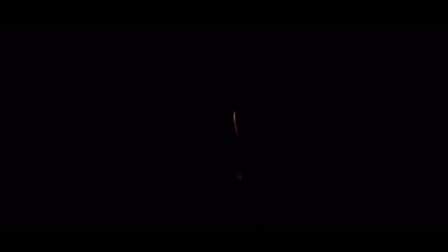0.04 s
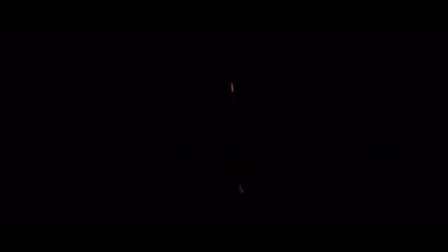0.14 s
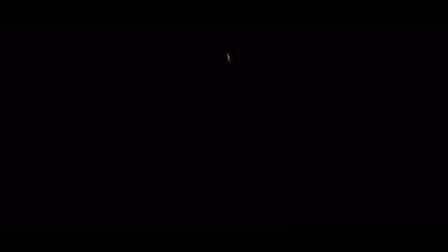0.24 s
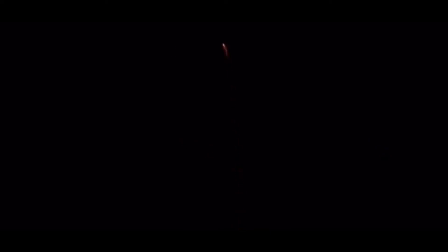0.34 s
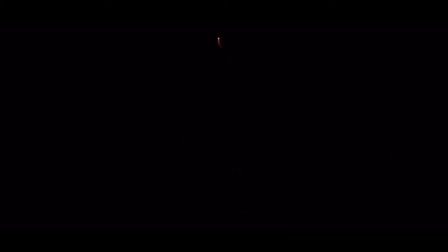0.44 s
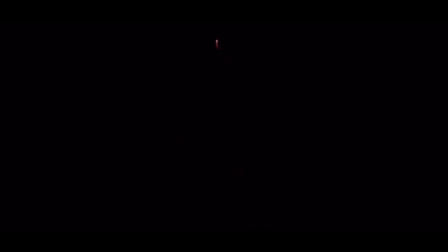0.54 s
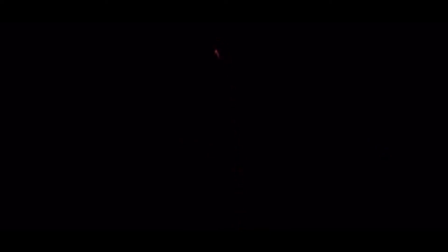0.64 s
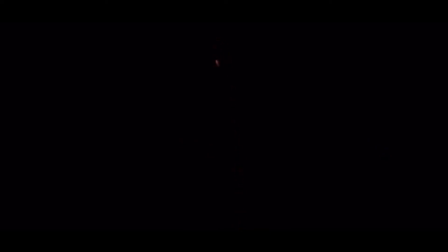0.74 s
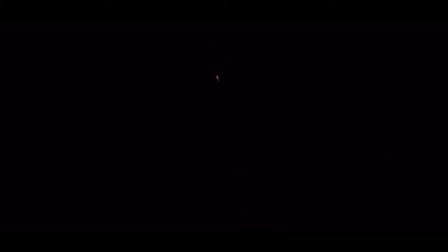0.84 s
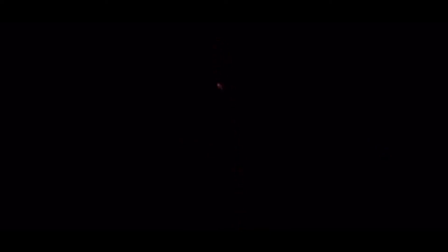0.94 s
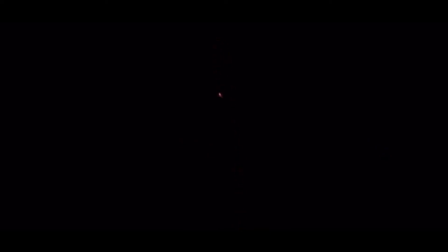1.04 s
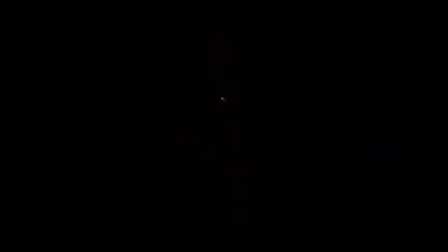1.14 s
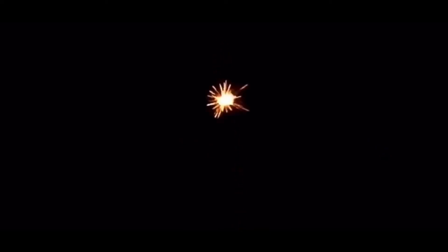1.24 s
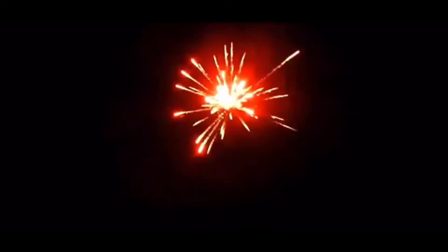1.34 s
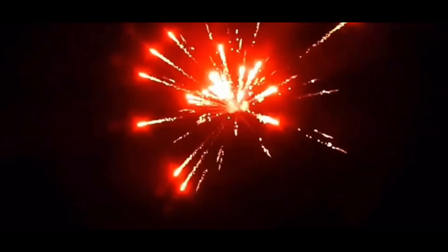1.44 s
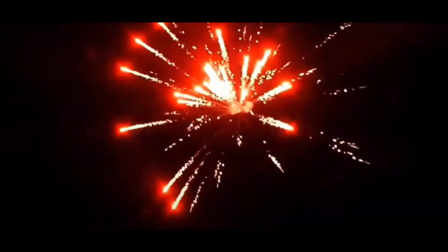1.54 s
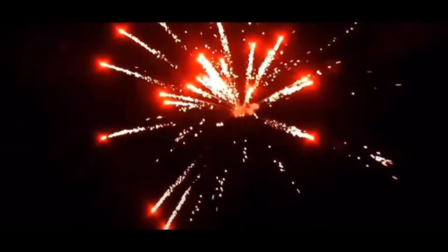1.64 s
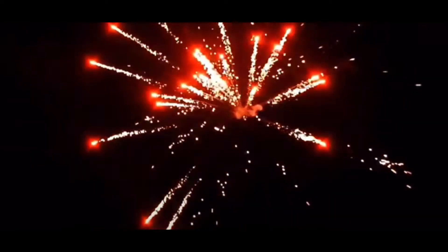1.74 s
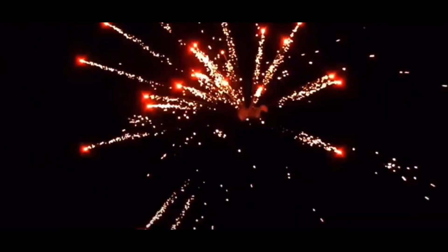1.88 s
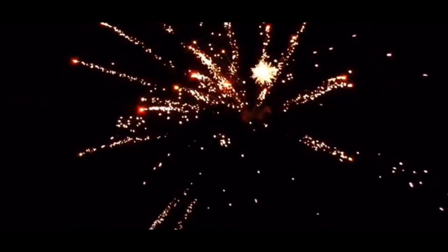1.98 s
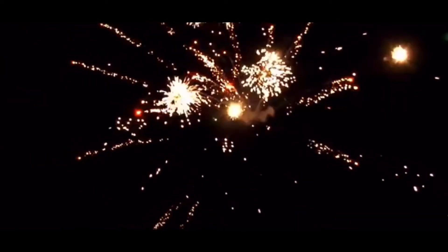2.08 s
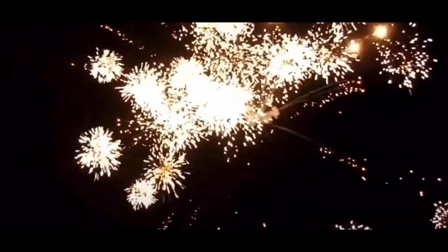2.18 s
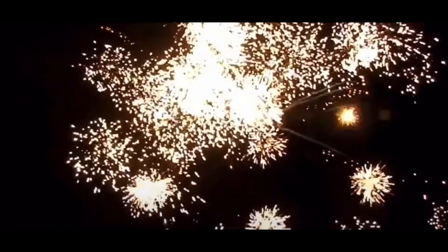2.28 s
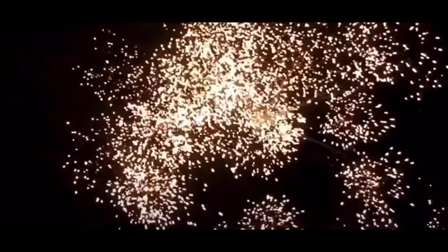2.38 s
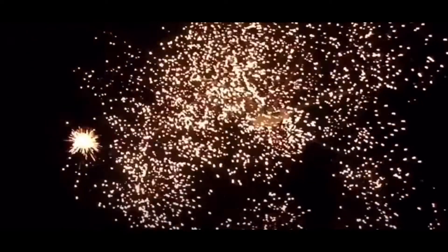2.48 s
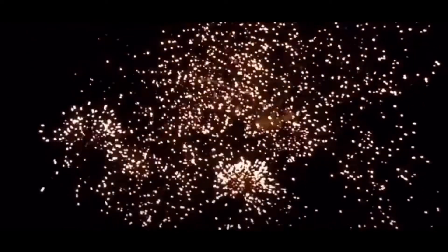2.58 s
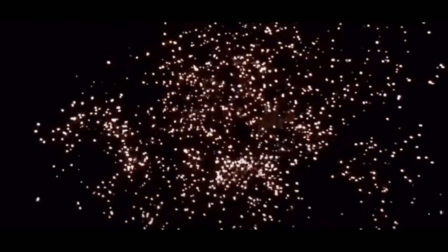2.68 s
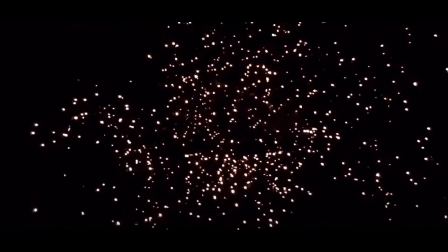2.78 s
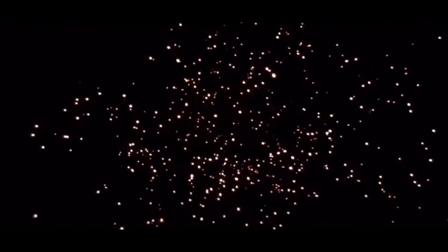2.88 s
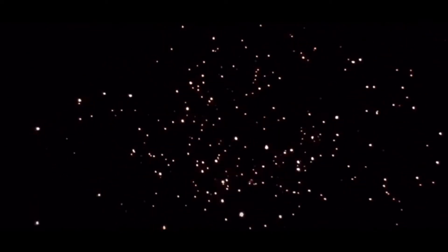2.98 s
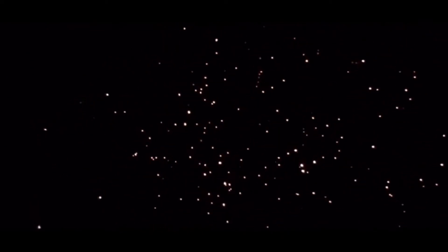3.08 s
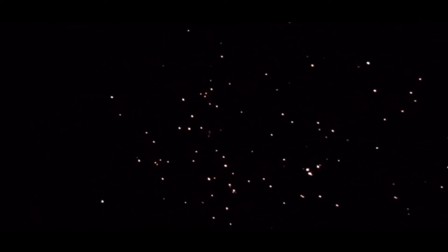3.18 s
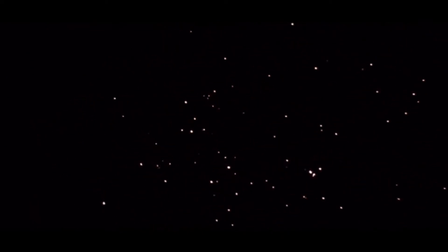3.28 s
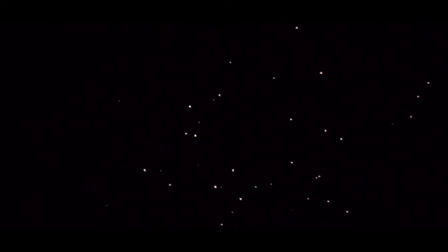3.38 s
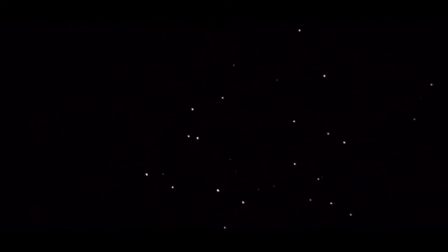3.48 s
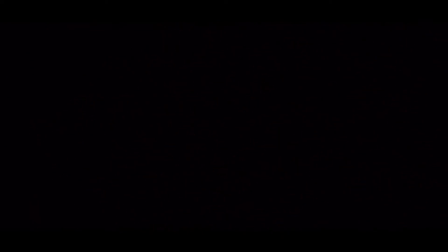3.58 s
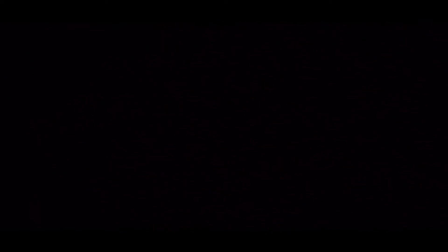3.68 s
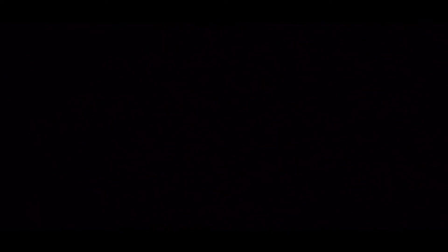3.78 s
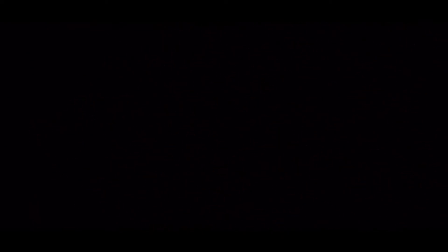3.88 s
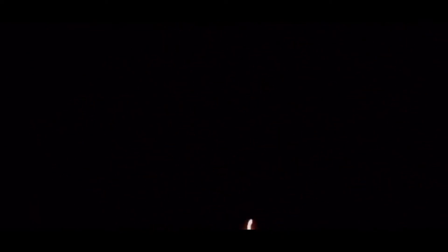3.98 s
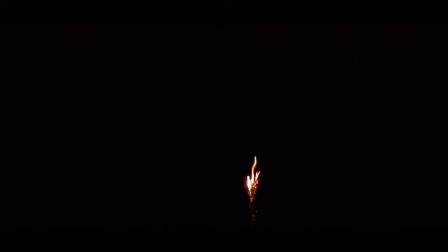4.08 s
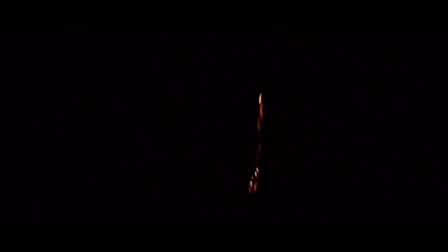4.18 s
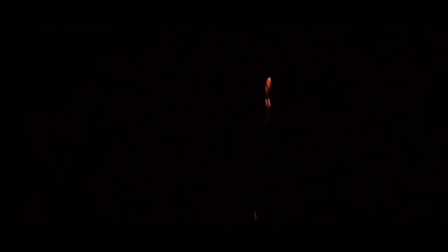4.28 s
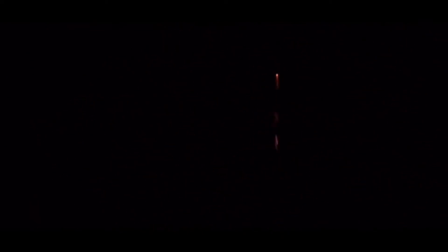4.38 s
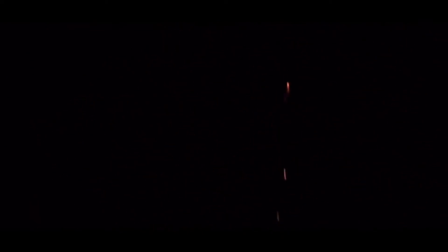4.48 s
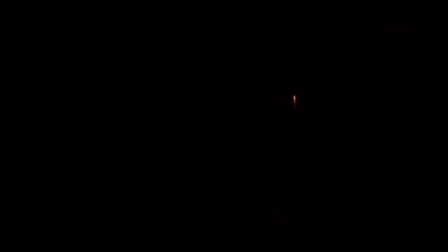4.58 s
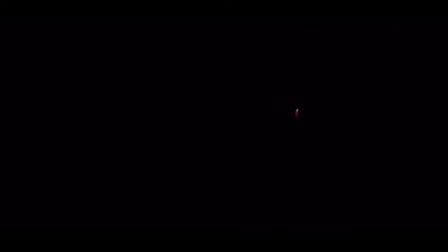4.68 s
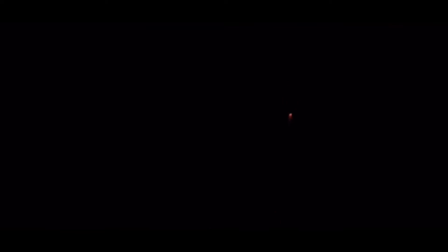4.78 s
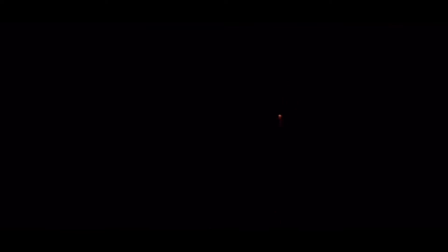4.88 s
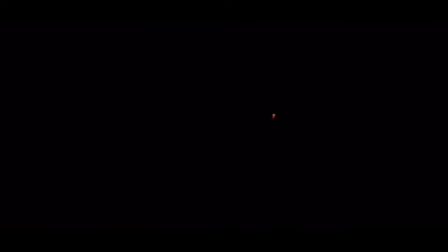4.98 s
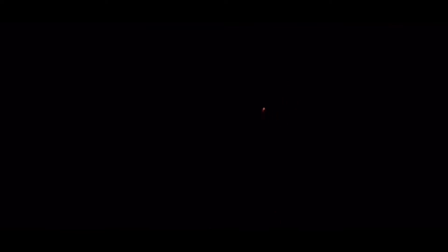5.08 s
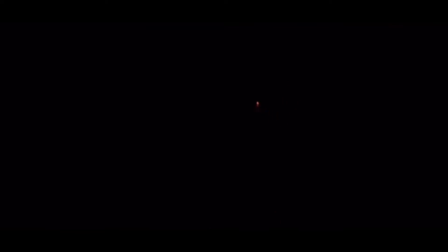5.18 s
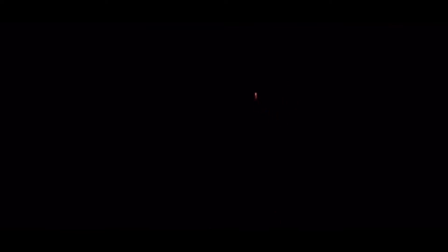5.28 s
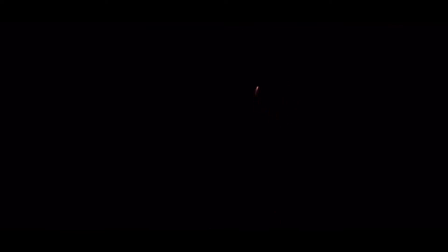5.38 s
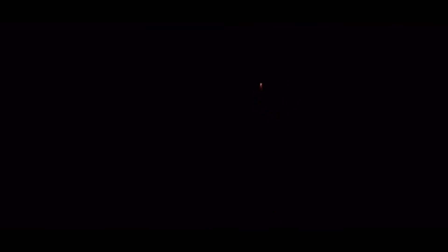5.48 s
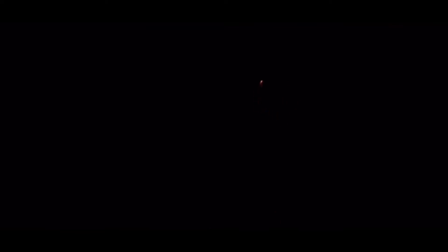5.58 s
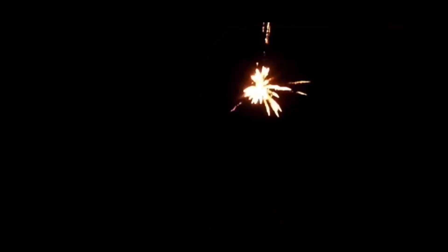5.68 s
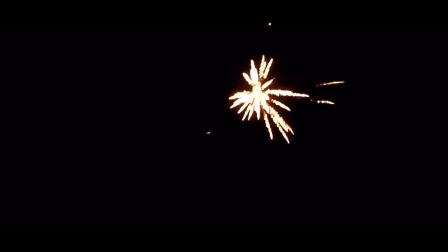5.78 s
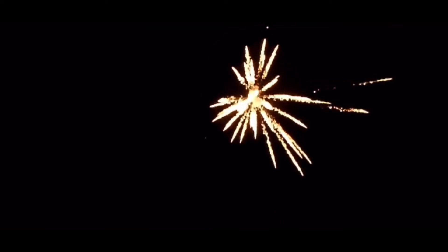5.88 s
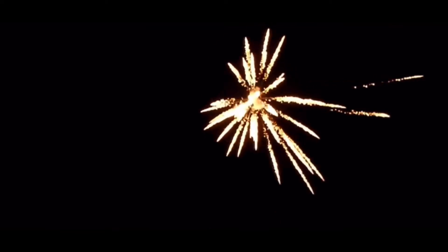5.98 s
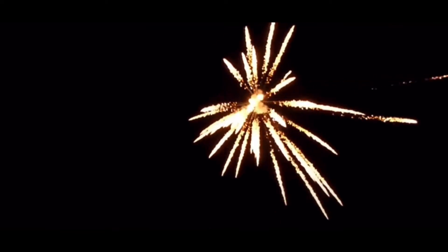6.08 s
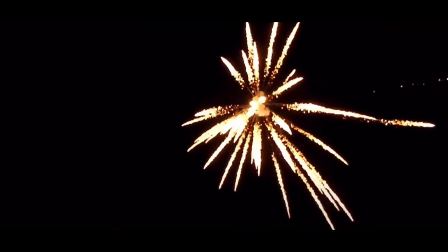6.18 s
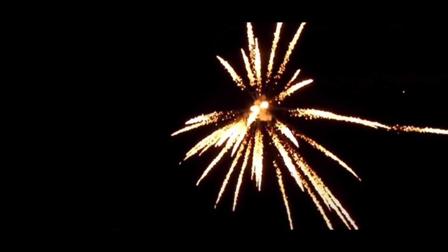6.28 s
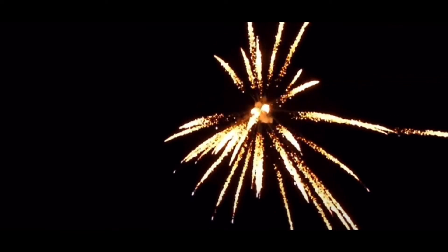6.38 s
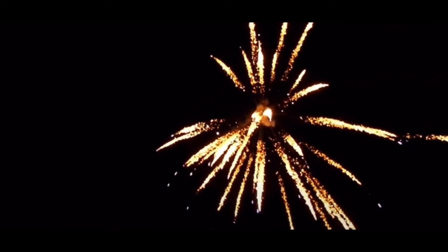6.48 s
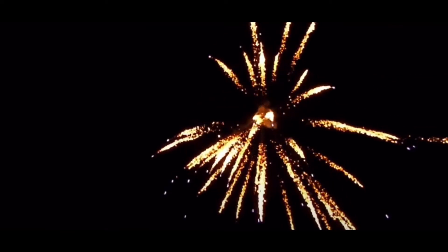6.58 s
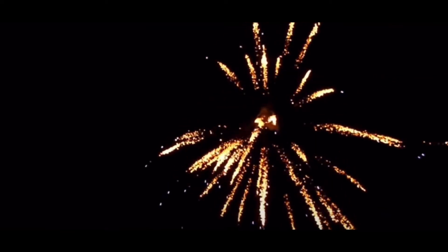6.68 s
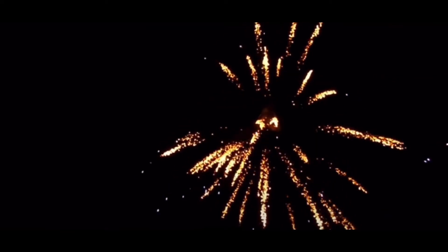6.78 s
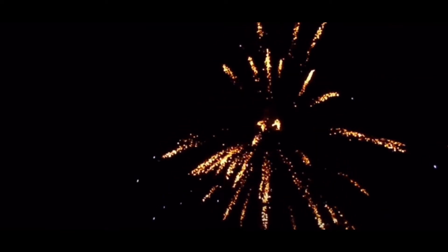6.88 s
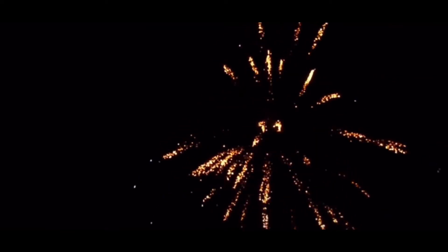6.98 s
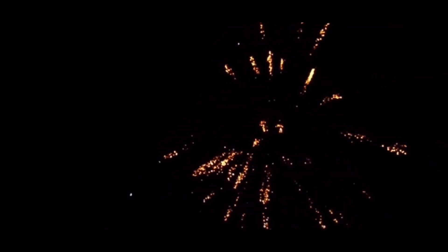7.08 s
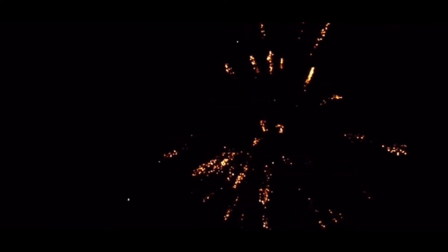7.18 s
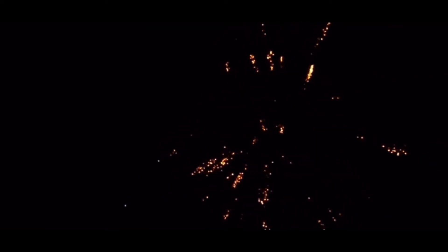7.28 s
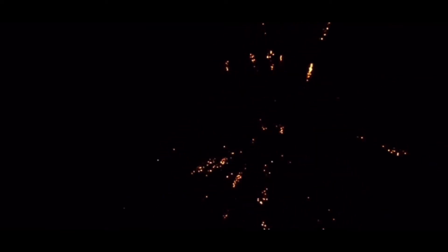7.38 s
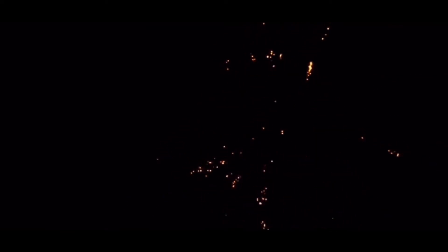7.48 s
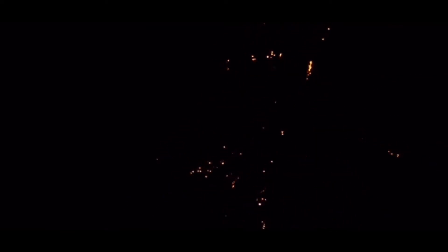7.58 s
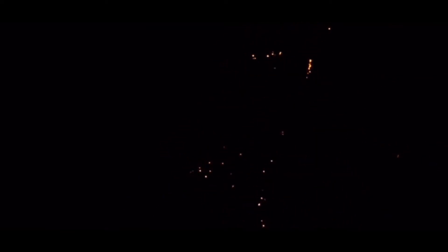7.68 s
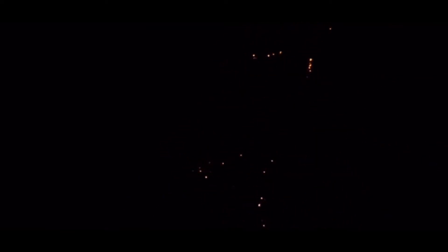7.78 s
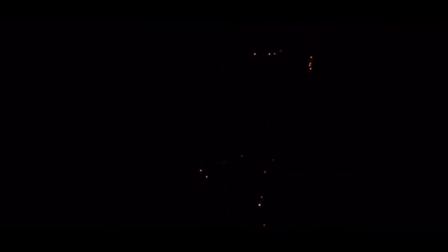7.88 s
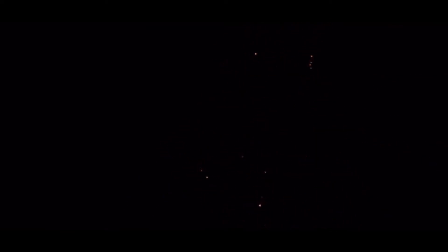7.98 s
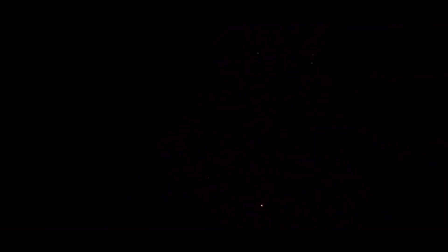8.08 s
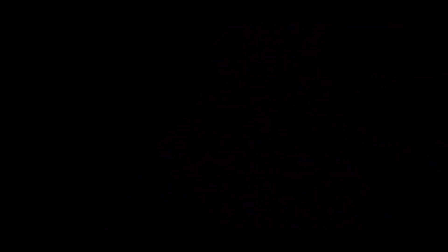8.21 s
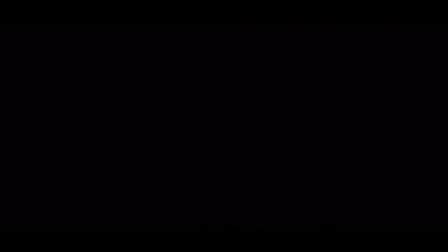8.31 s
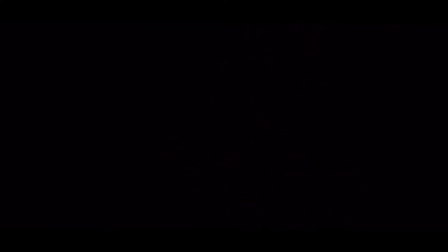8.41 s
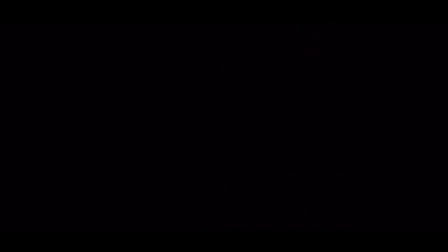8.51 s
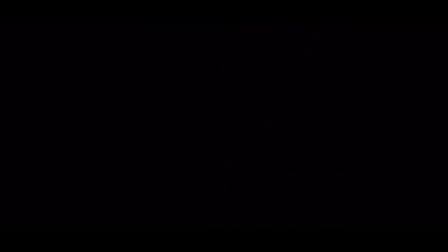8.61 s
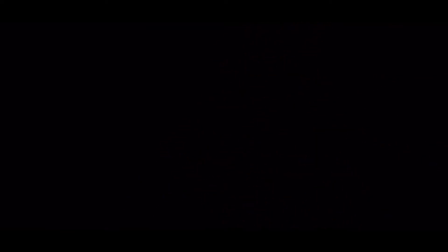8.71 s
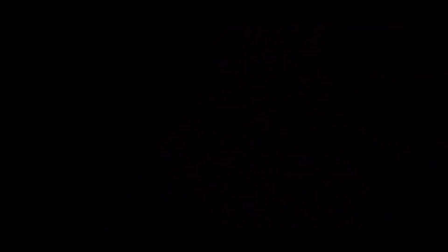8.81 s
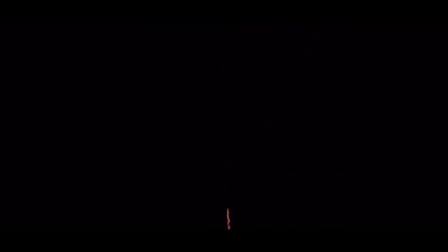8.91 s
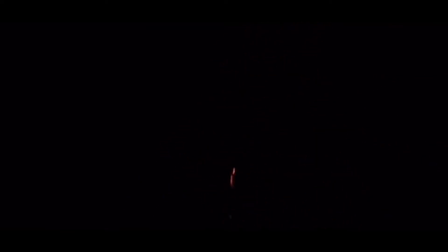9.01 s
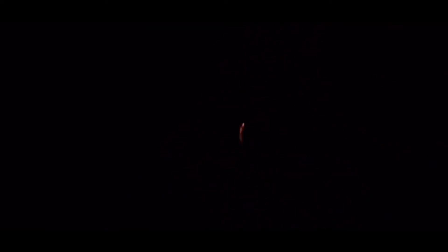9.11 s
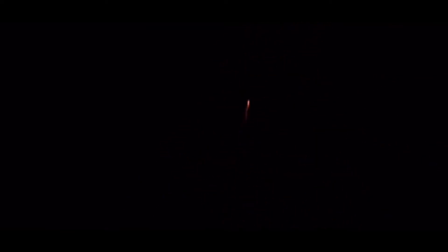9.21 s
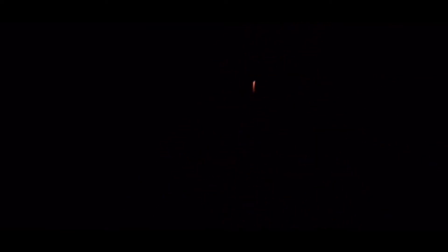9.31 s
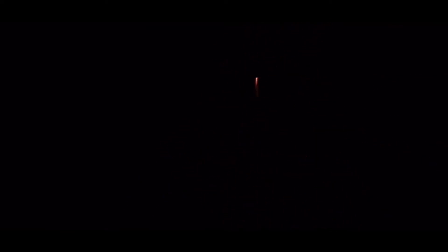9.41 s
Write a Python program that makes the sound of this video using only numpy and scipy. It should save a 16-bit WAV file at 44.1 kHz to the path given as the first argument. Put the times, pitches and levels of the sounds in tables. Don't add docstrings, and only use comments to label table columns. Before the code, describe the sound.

Night fireworks outdoors, picked up close by a small overloading stereo recorder. At 0 s a launch boom is already rolling away, with small snaps at 0.5 s and a wall slap near 1 s. At 1.55 s the first shell bursts in a massive clipped bang, its dense echo darkening as it decays. At 2.25 s sharp snaps lead into a loud crackling blast at 2.3 s, thinning into thick bright popping until 3.3 s, with wall slaps around 3-3.5 s. The roll cuts dead at 3.6 s to faint hum and hiss. A heavy launch thump comes at 4.1 s, a wall slap at 5.2 s, and a second huge bang at 5.9 s. Its rumble carries slap echoes at 6.4, 7 and 7.7 s and a fading sizzle. Another abrupt cut at 8.25 s leaves quiet night air and a small snap; a third booming launch at 8.84 s rolls into the end.

```python
import sys
import numpy as np
from scipy import signal
from scipy.fft import rfft, irfft
from scipy.io import wavfile
from scipy.ndimage import uniform_filter1d

SR = 44100
rng = np.random.default_rng(int(sys.argv[2]) if len(sys.argv) > 2 else 0)


def materialize(psi):
    bounded = np.clip(np.atleast_2d(psi).T, -1, 1)
    quanta = np.round(bounded * 32767).astype(np.int16)
    wavfile.write(sys.argv[1], SR, quanta)


def level_to_linear(level):
    exponent = np.asarray(level, float) / 20
    return 10 ** exponent


N = 416744

# (start [s], kind, true level [dB], treble [dB], bass [dB])
ROLLS = [
    (-.15, "launch", 12, 0, 1.5),
    (.961, "wall", -25, -30, -3.5),
    (1.544, "burst", 14, -0.9, -3),
    (2.244, "crackle", -13.5, -5, -4.5),
    (2.318, "crackle", 8, -2, -15.5),
    (4.101, "launch", 12.5, -0.6, -0.5),
    (5.211, "wall", -28.5, -21, -4.5),
    (5.896, "burst", 13, -2, -3),
    (6.961, "hill", -13.5, -39, -1.5),
    (8.841, "launch", 12, -1.5, -0.5),
]
# (frequency [Hz], density [dB per Hz])
ROLL_COLOUR = [(24, -61.5), (40, -33), (216, -5.5), (346, -5), (910, -4), (1080, -4), (1170, -8),
               (1730, -6.5), (2060, -12), (2990, -12.5), (3470, -24.5), (4130, -21.5), (9130, -41.5),
               (10300, -49), (15000, -56)]
# (frequency [Hz], gain [dB])
GROUND_COMB = [(400, 1), (540, 2.5), (800, -3), (1250, 1), (1750, 0.5), (2200, 1)]
# (frequency [Hz], share of the treble swing [ratio])
AIR_SHARE = [(1400, 0.14), (2000, 0.32), (2800, 0.59), (4500, 1.22), (7700, 1.85), (12000, 1.2)]
# (frequency [Hz], share of the bass swing [ratio])
BASS_SHARE = [(60, 1), (300, 0.72), (500, 0.62), (800, 0.12)]
# (frequency [Hz], shared power [ratio])
ROLL_LIKENESS = [(60, 0.91), (180, 0.97), (550, 0.68), (1650, 0.7), (4970, 0.54), (15000, 1)]
DECAY_LAWS = { "launch": dict(thin=0.15, fall_db=59, late_db=-26.5, late_fall_db=24.5, build_db=4.5, hold=.01, dull_db=28, most_db=15.5, drift_db=2.5),
              "burst": dict(fall_db=45, late_db=-18.5, late_fall_db=12.5, build_db=9, hold=0.007, dull_db=30.5, most_db=27.5, drift_db=-4),
              "crackle": dict(steady=0.37, fall_db=127, late_db=-15.5, late_fall_db=14.5, build_db=2, hold=0.55, dull_db=39.5, most_db=24, drift_db=30.5),
              "wall": dict(fall_db=71, late_db=-4.5, late_fall_db=18, build_db=.1, hold=.01, dull_db=23, most_db=6, drift_db=18),
              "hill": dict(thin=3.2, fall_db=79, late_db=-2.5, late_fall_db=10, build_db=1.5, hold=.01, dull_db=22.5, most_db=29, drift_db=8),
              }
CUTS = [
    3.611,
    8.256,
]
# (time [s], level over full scale [dB], push [Hz], t60 [s], rise [s])
FRONTS = [
    (1.546, 27.5, 395, 0.048, 0.00072),
    (2.318, 8, 600, .03, .003),
    (4.099, 17, 582, 0.089, 0.0059),
    (5.894, 30.5, 390, 0.041, 0.0035),
    (8.838, 16.5, 563, 0.26, 0.014),
]
# (time [s], peak level [dB], frequency [Hz], left-right [dB], crisp edge [dB])
BURST_SLAPS = [(0.508, -2, 364, 5, -25), (0.54, -9.5, 383, 5, -30), (0.593, -12, 433, 1, -25),
               (0.787, -12, 484, -6, -30), (0.821, -15, 560, -1.0, -28), (2.939, -5, 620, 8, -25),
               (3.146, -6, 312, -3.5, -25), (3.209, -12.5, 443, 11, -28), (3.308, -2.5, 401, 12.5, -23),
               (3.418, -0.5, 405, 7, -20), (3.443, -0.5, 346, 7, -25), (3.474, -11, 393, -7, -21),
               (3.523, -8, 460, 9, -28), (6.383, 5, 544, -2, -24), (6.518, -2, 1100, -3.5, -23),
               (6.959, 8.5, 533, 13, -9.5), (6.979, -1, 583, 8, -22), (7.29, -5, 546, 7.5, -21),
               (7.33, -13, 473, 13, -22), (7.662, -8, 517, 7, -12), (7.667, -4.5, 463, 7, -2.5),
               (7.724, -13.5, 435, -3, -25), (7.791, -21, 448, -7, -30), (7.963, -5.5, 585, 11, -4)]
LAUNCHES = [
    -.15,
    4.1,
    8.84,
]
# (delay [s], peak level [dB], frequency [Hz], left-right [dB], crisp edge [dB])
WALLS = [(1.11, -3.5, 500, 12.5, -5), (1.243, -14.5, 950, 6, -21), (1.333, -19.5, 1590, -10, -20),
         (1.442, -24, 643, 9, -35), (1.502, -11, 800, 10, -19), (1.563, -34, 1410, -4, -19),
         (1.641, -24, 725, 0.1, -37)]
# (time [s], peak level [dB], centre [Hz], left-right [dB])
STAR_SNAPS = [(0.4968, -16, 6600, -9), (1.2064, -17, 6700, -7.5), (2.2453, 0.5, 5100, 7),
              (2.2524, 5.5, 6240, 3), (3.0959, -15, 5500, -1.5), (3.1244, -16.5, 5500, 0),
              (3.1577, -30, 5660, -7), (3.1847, -20, 5510, -1.5), (3.2674, -17.5, 5260, -1),
              (3.3583, -28.5, 7500, 2), (3.4194, -37, 5800, 3), (3.4451, -37.5, 6500, 2.5),
              (4.615, -40, 11000, .1), (3.5778, -19, 6150, -1), (8.1514, -38.5, 5400, -5),
              (8.2857, -22, 4870, -5), (5.2125, -34, 5000, 5), (7.672, -40, 4500, -2)]
# (time [s], peak level [dB], centre [Hz], left-right [dB])
EMBER_SNAPS = [(0.4973, -14.5, 3600, 4), (0.6657, -13.5, 2650, -3), (0.6789, -16, 3100, 3),
               (1.207, -19, 3700, 5), (2.2463, -7, 3000, 0.5), (2.2514, 2, 3120, 12), (3.575, -16, 2500, 0),
               (3.5776, -11.5, 3440, 6), (5.2115, -17, 2260, 8), (5.2979, -26, 2760, -7),
               (6.545, -28, 3040, -2), (6.9576, -24, 2300, 10), (6.9844, -22.5, 2520, -7),
               (7.9633, -35, 2550, -1.5), (8.285, -15, 2400, 3), (8.2847, -9.5, 1050, 3)]
STRAGGLERS = dict(start=2.57, end=3.29, per_s=1600, level_db=-24, fade_db=18, low_hz=3000, high_hz=7960, spread_db=2.5)
# (frequency [Hz], density [dB per Hz])
NIGHT_COLOUR = [(24, -54), (40, -27), (102, 7.5), (178, -0.5), (899, 7.5), (1150, 2), (1300, 7.5),
                (2520, -14.5), (3060, -11.5), (3460, -25), (4320, -18.5), (5250, -25), (5940, -19.5),
                (13000, -34), (14000, -51)]
# (frequency [Hz], shared power [ratio])
NIGHT_LIKENESS = [(60, 1), (240, 0.79), (950, 0.68), (3770, 0.77), (15000, 0.99)]
# (frequency [Hz], share of the sizzle swing [ratio])
HISS_SHARE = [(1500, 0.19), (2500, 0.75), (4000, 1), (9000, 0.28)]
# (start [s], end [s], added treble [dB], fade [dB/s])
SIZZLE = [(0.668, 1.55, 12.5, 8.5), (3.61, 5.9, 8, 0), (6.3, 7.6, 28, 19), (8.138, 8.301, 6.5, -6),
          (8.297, 8.478, 11, 1), (8.48, 8.9, 5.5, -8.5)]

HOP = 128
BASS_REF_DB, TREBLE_REF_DB = -5, -11.5
DEEP_HZ, DEEP_LOSS_DB = 170, 7
BUILD_S = 0.062
LEAD = 300
LEAD_DB, BURST_RING_DB, WALL_RING_DB = -14, -14.5, -25
BURST_SWINGS, WALL_SWINGS = 1.53, 1.1
PUSH, PUSH_HZ, SLAP_LOW_HZ = 0.12, 330, 120
SNAP_T60, EDGE_HZ = 0.026, 800
STAR_OCTAVES, EMBER_OCTAVES, EDGE_OCTAVES = 0.44, 0.5, 0.61
NIGHT_DB, HISS_DB = -37.5, 1.5


def rolls(echoes_per_s=1000, spread_db=3.5, grain_hz=1300, clumpy_db=2.0, rise=0.0052):
    size_db = spread_db * np.minimum(rng.exponential(1, (3, N)), 4)
    size = level_to_linear(size_db) * np.sign(rng.random((3, N)) - 0.5)
    single = evened(size * (rng.random((3, N)) < echoes_per_s / SR))
    blurred = rng.standard_normal((3, N))
    low = signal.lfilter(*signal.butter(1, grain_hz, fs=SR), single)
    high = signal.lfilter(*signal.butter(1, grain_hz, "high", fs=SR), blurred)
    hz, t, z = paired(low + high + 0.61 * blurred, ROLL_LIKENESS)

    colour_db = read(ROLL_COLOUR, hz) + read(GROUND_COMB, hz)
    middle = (hz > 600) * (hz < 2200)
    z = z / np.sqrt(np.mean(abs(z) ** 2) * np.mean(level_to_linear(2 * colour_db) * middle))

    level_db, treble_db, bass_db, thin = course(t)[1:]
    swing_db = np.outer(read(BASS_SHARE, hz), bass_db - BASS_REF_DB)
    swing_db += np.outer(read(AIR_SHARE, hz), treble_db - TREBLE_REF_DB)
    deep_loss_db = DEEP_LOSS_DB / (1 + (hz / DEEP_HZ) ** 4)
    swing_db -= np.outer(deep_loss_db, np.clip(-level_db / 15 - 0.6, 0, 1) * thin)
    swing_db += clumpy_db * patches(len(hz), len(t), 4, 8)
    faint = (hz[:, None] > 7500) * (patches(len(hz), len(t), 7, 10) > 0.6)
    swing_db -= 25 * faint
    roll = sounded(z * level_to_linear(colour_db[:, None] + swing_db)) * level_to_linear(-23.5)

    age, level_db = course(np.arange(N) / SR)[:2]
    onset = np.minimum(age / rise, 1) ** 3
    return roll * uniform_filter1d(level_to_linear(level_db) * onset, 60)


def course(time):
    out = np.zeros((5, len(time)))
    ends = [row[0] for row in ROLLS[1:]] + [np.inf]
    for (start, kind, level_db, treble_db, bass_db), end in zip(ROLLS, ends):
        law = DECAY_LAWS[kind]
        on = (time >= start) & (time < end)
        age = time[on] - start
        fast_db = -law["fall_db"] * np.maximum(age - law.get("steady", 0), 0)
        late_db = law["late_db"] - law["late_fall_db"] * age
        decay_db = 10 * np.log10(level_to_linear(2 * fast_db) + level_to_linear(2 * late_db))
        build_db = law["build_db"] * np.exp(-age / BUILD_S)
        after = np.maximum(age - law["hold"], 0)
        dull_db = np.minimum(law["dull_db"] * after, law["most_db"])
        thin = law.get("thin", 1) + 0 * age
        out[:, on] = (age, level_db + decay_db - build_db, treble_db - dull_db,
                      bass_db + law["drift_db"] * after, thin)
        for cut in CUTS:
            out[1, on & (time > cut) & (start < cut)] = -200
    return out


def fronts():
    out, t = np.zeros((2, N)), np.arange(4096) / SR
    for s, db, hz, t60, rise in FRONTS:
        band = signal.butter(2, [0.724 * hz, 1.31 * hz], "band", fs=SR)
        swings = evened(signal.lfilter(*band, rng.standard_normal(len(t))))
        swings = np.roll(swings, -800)
        envelope = level_to_linear(db - 60 * t / t60) * np.minimum(t / rise, 1) ** 3
        add(out, s, envelope * swings, 0)
    return out


def slaps(ring_t60=0.14, copies_per_s=700, lag=0.002):
    out, t = np.zeros((2, N)), np.arange(6000) / SR
    for k, (s, db, hz, pan_db, edge_db) in enumerate(answers()):
        of_burst = k < len(BURST_SLAPS)
        swings = BURST_SWINGS if of_burst else WALL_SWINGS
        ring_db = BURST_RING_DB if of_burst else WALL_RING_DB

        u = np.arange(0, 5, hz / SR)
        envelope = np.minimum(u / 0.66, 1) ** 2 * np.exp(-(u / swings) ** 2)
        swing = -np.sin(2 * np.pi * 1.373 * u ** 0.78) * envelope
        v = np.arange(len(u)) * PUSH_HZ / SR
        swing = swing + PUSH * np.sin(2 * np.pi * v) * (v < 1)

        trail = level_to_linear(ring_db - 60 * t / ring_t60) * rng.standard_normal(len(t))
        trail = trail * (rng.random(len(t)) < copies_per_s / SR)
        lead = level_to_linear(LEAD_DB) * t[:LEAD] / t[LEAD] * rng.standard_normal(LEAD)
        lead = lead * (rng.random(LEAD) < 0.04)
        copies = np.append(lead, trail)
        copies[LEAD] = 1
        add(out, s + lag - LEAD / SR, level_to_linear(db + 3) * signal.oaconvolve(copies, swing), pan_db)
    return signal.lfilter(*signal.butter(2, SLAP_LOW_HZ, "high", fs=SR), out)


def answers():
    return BURST_SLAPS + [(s + delay, *rest) for s in LAUNCHES for delay, *rest in WALLS]


def snaps():
    out, t = np.zeros((2, N)), np.arange(2048) / SR
    f = np.fft.rfftfreq(len(t), 1 / SR) + 1
    edges = [(s + 0.0018, edge_db, max(hz, EDGE_HZ), pan_db / 2) for s, db, hz, pan_db, edge_db in answers()]
    kinds = (STAR_SNAPS, STAR_OCTAVES), (EMBER_SNAPS, EMBER_OCTAVES), (edges, EDGE_OCTAVES)
    for rows, octaves in kinds:
        for s, db, hz, pan_db in rows:
            band = 1 / (1 + (np.log2(f / hz) / octaves) ** 2) ** 2
            noise = evened(irfft(rfft(rng.standard_normal(len(t))) * band))
            envelope = level_to_linear(db - 5 - 60 * t / SNAP_T60) * np.minimum(t / 0.00062, 1)
            add(out, s - 0.001, envelope * noise, pan_db)
    return out


def stragglers(start, end, per_s, level_db, fade_db, low_hz, high_hz, spread_db):
    out, t = np.zeros((2, N)), np.arange(SR) / SR
    size = level_to_linear(spread_db * np.minimum(rng.exponential(1, (3, SR)), 4))
    size = size * (rng.random((3, SR)) < per_s / SR)
    puffs = signal.lfilter([1], [1, -0.99], size) * rng.standard_normal((3, SR))
    band = signal.butter(2, [low_hz, high_hz], "band", fs=SR)
    pops = evened(signal.lfilter(*band, puffs[0] + 0.43 * puffs[1:]))
    out[:, round(start * SR):][:, :SR] = pops * level_to_linear(level_db - fade_db * t) * (t < end - start)
    return out


def night(patchy_db=0.6):
    hz, t, z = paired(rng.standard_normal((3, N)), NIGHT_LIKENESS)
    sizzle_db = np.zeros(len(t))
    for start, end, db, fade_db in SIZZLE:
        sizzle_db += (t > start) * (t <= end) * (db - fade_db * (t - start))
    hiss_db = np.outer(read(HISS_SHARE, hz), HISS_DB + sizzle_db)
    field_db = read(NIGHT_COLOUR, hz)[:, None] + hiss_db + patchy_db * patches(len(hz), len(t), 8, 30)
    return level_to_linear(NIGHT_DB) * evened(sounded(z * level_to_linear(field_db)))


def evened(x):
    return x / np.sqrt(np.mean(x ** 2) + 1e-20)


def read(points, hz):
    f, value = np.transpose(points)
    return np.interp(np.log(hz + 1), np.log(f + 1), value)


def add(mix, s, sound, pan_db):
    part = mix[:, round(s * SR):][:, :len(sound)]
    part += sound[:part.shape[1]] * level_to_linear(np.array([[pan_db / 2], [-pan_db / 2]]))


def paired(sources, likeness):
    hz, t, (common, left, right) = signal.stft(sources, SR, nperseg=4 * HOP, noverlap=3 * HOP)
    share = np.clip(read(likeness, hz), 0, 1)[:, None]
    return hz, t, np.sqrt(share) * common + np.sqrt(1 - share) * np.array([left, right])


def sounded(z):
    return signal.istft(z, SR, nperseg=4 * HOP, noverlap=3 * HOP)[1][:, :N]


def patches(bins, frames, wide, long):
    blobs = uniform_filter1d(rng.standard_normal((bins, frames)), wide, 0)
    return evened(uniform_filter1d(blobs, long, 1))


def scene():
    return rolls() + fronts() + slaps() + snaps() + stragglers(**STRAGGLERS) + night()


def band_limit(x):
    return signal.sosfilt(signal.butter(12, 15710, fs=SR, output="sos"), x)


def record(dry, ceiling=0.65, low_hz=28, ring_hz=2900, ring=0.05, grit_db=-16):
    time, gain = np.arange(N) / SR, np.ones(N)
    for s in (FRONTS[0][0], FRONTS[2][0]):
        gain[(time > s - 0.016) & (time < s - 0.002)] = level_to_linear(-23)
    x = dry * uniform_filter1d(gain, 80)
    x = x / (1 + abs(x / ceiling) ** 5) ** 0.2
    x = signal.lfilter(*signal.butter(1, low_hz, "high", fs=SR), x)
    x = x + ring * signal.lfilter(*signal.iirpeak(ring_hz, 1.5, fs=SR), x)
    overload = signal.lfilter([0.002], [1, 0.002 - 1], x ** 2) ** 2 / ceiling ** 3
    grit = signal.lfilter(*signal.butter(1, 3500, fs=SR), rng.standard_normal(x.shape))
    mix = x + level_to_linear(grit_db) * 2 * overload * grit
    return band_limit(mix)


dry = scene()
out = record(dry)
materialize(out)
```